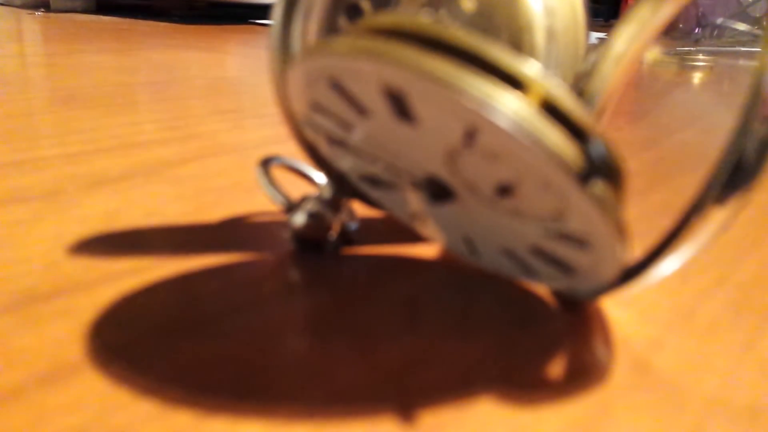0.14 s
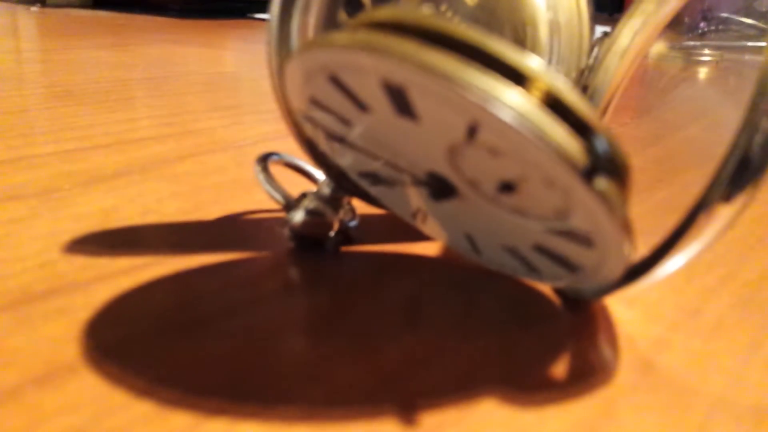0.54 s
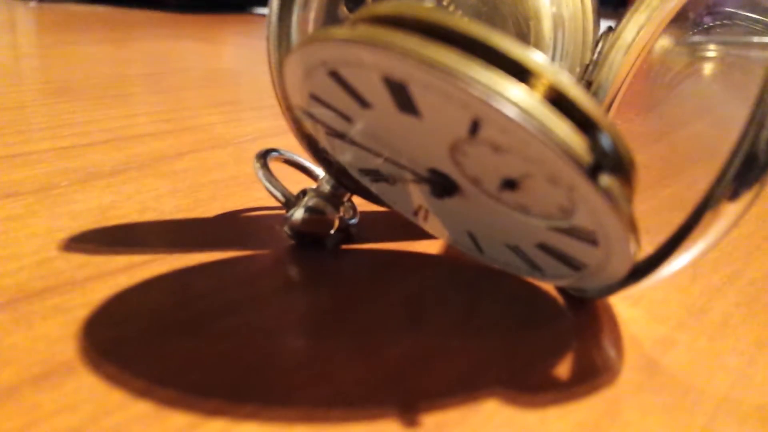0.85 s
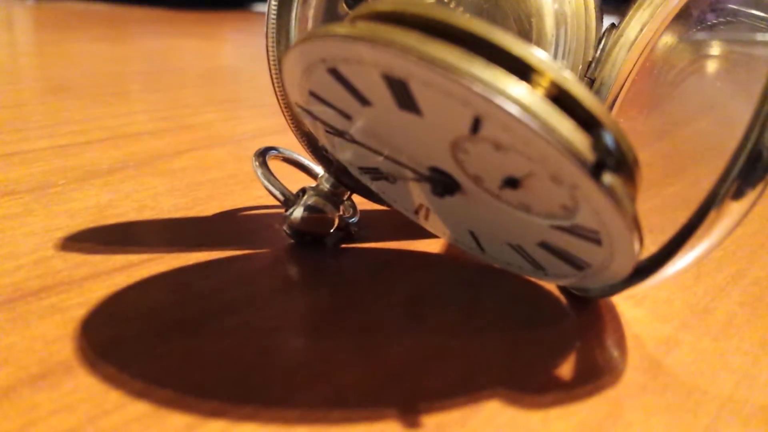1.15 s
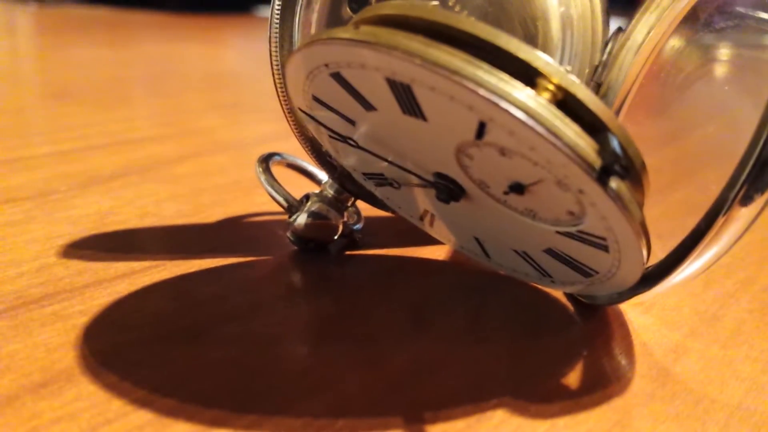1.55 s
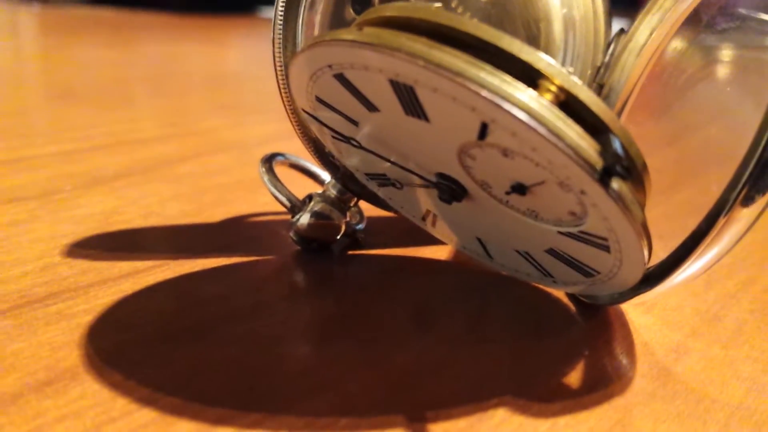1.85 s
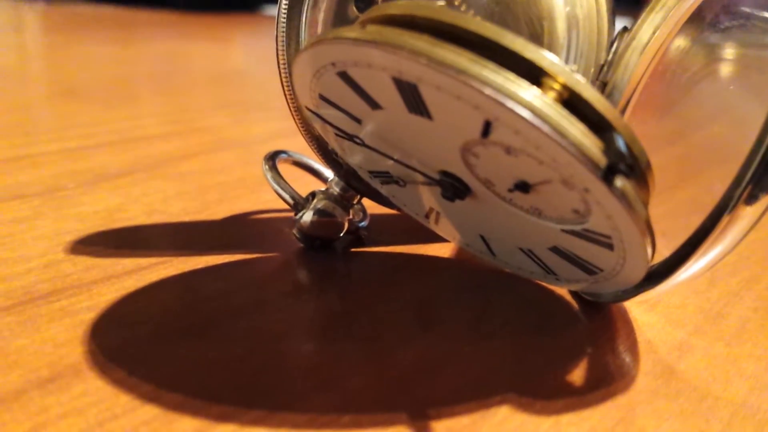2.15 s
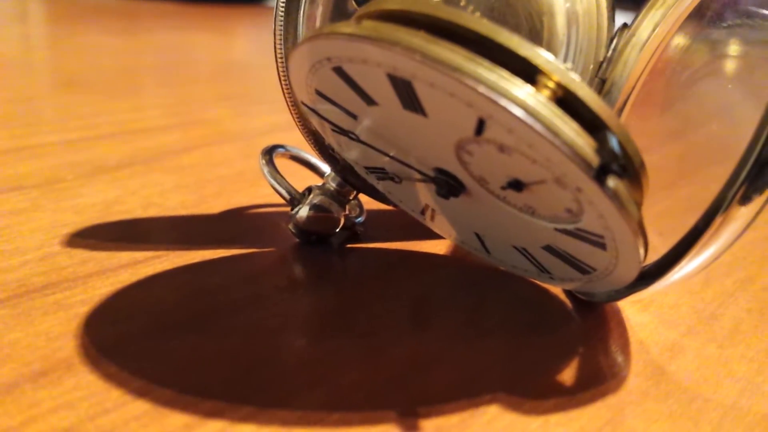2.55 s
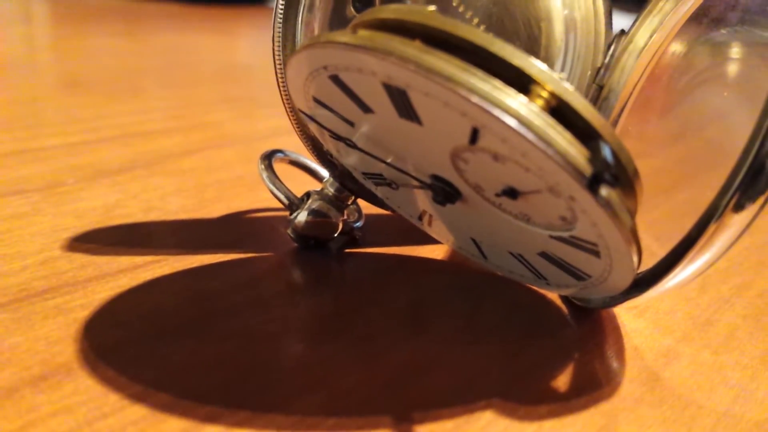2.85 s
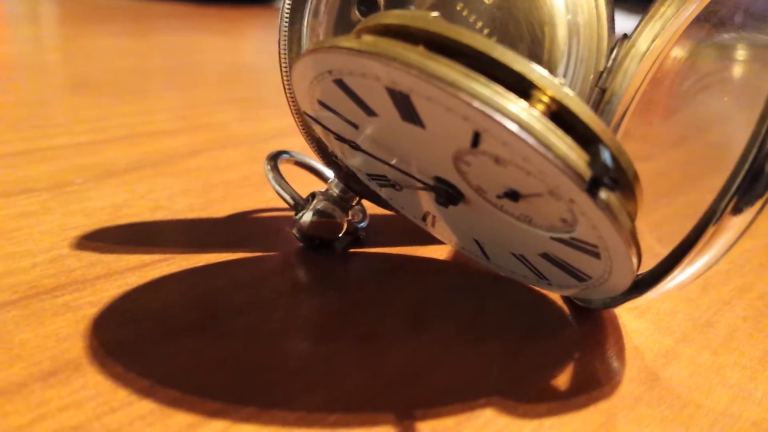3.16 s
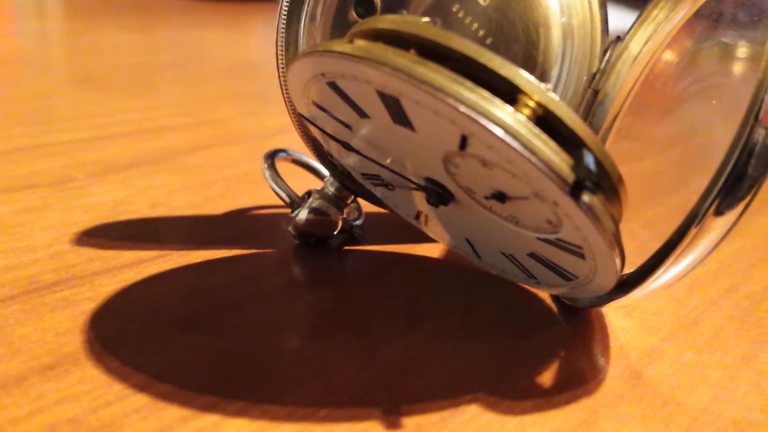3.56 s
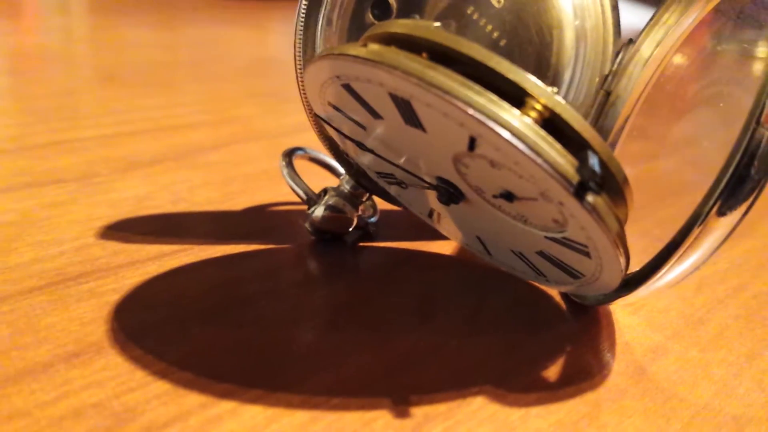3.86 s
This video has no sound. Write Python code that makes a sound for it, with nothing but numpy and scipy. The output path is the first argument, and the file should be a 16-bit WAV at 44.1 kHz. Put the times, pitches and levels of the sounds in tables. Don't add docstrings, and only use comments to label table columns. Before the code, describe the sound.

Mechanical watch beats in uneven tick-tock pairs, each a tiny cluster of metallic clicks, growing louder on the right; a faint lens whirr stops early, a sharp double knock hits midway, handling rustles follow.

```python
import sys
import numpy as np
from scipy import signal
from scipy.io import wavfile
from scipy.ndimage import uniform_filter1d

SR = 44100
rng = np.random.default_rng(int(sys.argv[2]) if len(sys.argv) > 2 else 0)


def amplitude_ratio(level_db):
    exponent = np.asarray(level_db, float) / 20
    return 10 ** exponent


def bounce(signal):
    frames = np.transpose(np.atleast_2d(signal))
    limited = np.clip(frames, -1, 1)
    pcm = np.round(limited * 32767).astype(np.int16)
    wavfile.write(sys.argv[1], SR, pcm)


N = 176400

# f/Hz, level/dB per Hz
LEFT_FLOOR = [(25, -100), (60, -83.5), (170, -88.5), (320, -96), (650, -92.5), (1500, -104), (2600, -110),
              (6000, -113)]
RIGHT_FLOOR = [(25, -102), (110, -89), (600, -97.5), (2200, -108), (5800, -109), (7200, -100), (8500, -109),
               (12000, -111)]
# f/Hz, likeness/-1 to 1
LIKENESS = [(60, 0.5), (240, 0.47), (950, 0.044), (15000, -0.057)]
# t/s, level/dB
HISS_RIDE = [
    (0, 0),
    (2.4, 0.5),
    (2.5, 10),
    (2.7, 0.5),
    (3.2, 1),
    (3.4, 5.5),
    (3.85, 5.5),
    (3.92, -0.5),
    (4, 2.5),
]
HISS_TOP_HZ, PATCH_DB, SWELL_DB, PORT_FLUTTER_DB = 14700, 3, -1, 2.5
WHIRR_END_S, WHIRR_DB, WHIRR_HZ, WHIRR_TOP_HZ = 1.135, -69, 805, 2670

# t/s, base level of lead-in, rattle and ring/dB, added lead-in level/dB, rattle length/s, added
# held ring level/dB
TICKS = [(0.1511, -31.5, -0.5, .006, 0), (0.5929, -30.5, -1.5, 0.0068, -5),
         (1.036, -29.5, -3.5, 0.0061, -4.5), (1.4786, -29, -2.5, 0.0068, -9.5),
         (1.9221, -25, -2, 0.0075, -7), (2.3641, -22.5, 0, 0.0054, -10), (2.806, -24, -3.5, 0.0081, -5.5),
         (3.249, -23.5, -1, .005, -4), (3.6689, -18.5, -5, 0.0056, -5.5)]
TOCKS = [(0.2828, -29.5, -3, 0.0098, -13), (0.7267, -30.5, -2, 0.011, -8.5), (1.17, -28, -4, 0.014, -13.5),
         (1.6137, -26, -6, 0.011, -19), (2.056, -21, -2.5, 0.014, -17), (2.5006, -20, -15, 0.013, -8.5),
         (2.9423, -22, -2.5, 0.015, -13.5), (3.3846, -19.5, -2, 0.013, -10),
         (3.8041, -21, -2.5, 0.013, -4.5)]
# offset/s, level/dB
TICK_LEAD = [
    (-.0375, -7.5),
    (-.0195, -2),
]
TOCK_LEAD = [
    (-.0318, -14.5),
    (-.0158, -11),
]
# t/s, peak level/dB
TICK_STRIKES = [(0.1518, -28.0), (0.1534, -30.0), (0.155, -36.0), (0.1563, -34.0), (0.1577, -38.0),
                (0.5939, -30.0), (0.5974, -38.0), (0.5988, -41.0), (0.6014, -40.0), (1.0368, -33.0),
                (1.0381, -32.0), (1.0398, -33.0), (1.0417, -42.0), (1.0431, -44.0), (1.0485, -36.0),
                (1.4795, -30.0), (1.4814, -36.0), (1.4828, -42.0), (1.4838, -38.0), (1.4851, -41.0),
                (1.494, -40.0), (1.9225, -22.0), (1.9243, -29.0), (1.9258, -32.0), (1.9271, -33.0),
                (1.9357, -31.0), (2.3644, -24.0), (2.3653, -27.0), (2.367, -33.0), (2.3787, -28.0),
                (2.8069, -17.0), (2.8085, -24.0), (2.8098, -27.0), (2.811, -30.0), (2.8119, -30.0),
                (3.2494, -19.0), (3.2504, -29.0), (3.2523, -31.0), (3.2627, -29.0), (3.6699, -20.0),
                (3.6714, -20.0), (3.6725, -21.0), (3.6746, -30.0), (3.6834, -25.0),
                (2.8185, -29),
]
TOCK_STRIKES = [(0.285, -28.0), (0.2863, -36.0), (0.2881, -30.0), (0.2902, -34.0), (0.2916, -31.0),
                (0.7281, -30.0), (0.7299, -35.0), (0.7312, -35.0), (0.7336, -34.0), (0.7352, -35.0),
                (0.7378, -36.0), (1.1714, -28.0), (1.1749, -30.0), (1.1775, -34.0), (1.1795, -34.0),
                (1.1809, -36.0), (1.6145, -28.0), (1.6182, -30.0), (1.6209, -31.0), (1.6247, -36.0),
                (1.6258, -37.0), (2.0568, -20.0), (2.0604, -21.0), (2.0631, -24.0), (2.065, -28.0),
                (2.0666, -28.0), (2.5, -14.0), (2.5038, -18.0), (2.5066, -22.0), (2.5103, -19.0),
                (2.943, -19.0), (2.9468, -22.0), (2.9497, -24.0), (2.952, -28.0), (2.9537, -25.0),
                (2.955, -28.0), (3.3858, -18.0), (3.3885, -24.0), (3.3895, -24.0), (3.3921, -25.0),
                (3.3941, -24.0), (3.3956, -24.0), (3.805, -15.0), (3.8086, -20.0), (3.8114, -19.0),
                (3.8134, -18.0), (3.815, -19.0), (3.8162, -20.0)]
# f/Hz, level/dB, time to fall 60 dB/s
TICK_MODES = [(2470, -28.5, 0.023), (5570, -7, 0.0045), (7060, -3, 0.0097), (8500, -22, 0.0031),
              (10500, -19.5, 0.0095), (13600, -18, .003)]
TOCK_MODES = [(4690, -26.5, 0.02), (5410, -15.5, 0.023), (6880, -4.5, 0.018), (8030, -6.5, 0.012),
              (9120, -15.5, 0.0069), (10500, -20.5, 0.0093), (13900, -19, 0.0038)]
LEAD_MODES = [(2460, -17.5, 0.022), (5450, -9, 0.004), (7180, 5, 0.0064)]
# f/Hz, width/Hz, level/dB
CLICK_COLOUR = [
    (6993, 2420, 7.5),
    (9500, 3600, -11.5),
]
CLICK_CUT_HZ, STRIKE_DB, WATCH_DB = 4400, 1.5, 2
TICK_RING_DB, TOCK_RING_DB, LEAD_RING_DB, RING_RISE_S = -0.5, -6, -3, 0.00017
DETUNE = 0.025
HELD_HZ, HELD_T60, HELD_LUMP_DB, TICK_SAG_DB_PER_S, TOCK_SAG_DB_PER_S = 6983, 0.0037, 2, 1515, 172
RATTLE_DB, RATTLE_PER_S, LEAD_FIZZ_DB, FIZZ_T60 = -22.5, 7200, -15.5, 0.031
JEWEL_HZ, JEWEL_DB, JEWEL_T60 = 12850, -33, 0.12
ROOM_DB, ROOM_T60 = -22.5, 0.29

# t/s, left level/dB, f/Hz, length/cycles, right level/dB
BUMPS = [(0.35, -42, 223, 1.37, -63), (0.562, -37.5, 317, 0.99, -66), (.602, -46.5, 550, 2.5, -73),
         (1.285, -46.5, 143, 0.71, -67), (1.453, -33.5, 286, 0.66, -53), (1.835, -43.5, 200, 1.4, -74),
         (2.4522, -14, 580, 2.1, -32.5), (2.4497, -44, 407, 0.48, -13), (2.4505, -29, 139, 0.79, -14.5),
         (2.4801, -9.5, 1440, 1, -13), (2.483, -19, 470, 1.04, -37), (2.977, -37.5, 211, 0.4, -59),
         (3.377, -44, 197, 2.4, -47), (3.584, -40, 303, 0.98, -23.5), (3.591, -53, 326, 1.1, -28.5),
         (3.739, -66, 138, 0.82, -37), (3.951, -31, 610, 0.98, -47)]
PORT_LAG_S = 0.00091
# t/s, length/s, level/dB
CHIRPS = [
    (0.379, 0.03, -65),
    (0.775, 0.044, -66),
    (1.986, 0.037, -62),
    (2.202, 0.039, -66),
]
CHIRP_HZ = 7500

# t/s, length/s, level/dB
LEFT_RUBS = [(2.456, 0.078, -43), (2.57, 0.034, -56), (2.943, 0.075, -50.5), (3.015, 0.088, -53.5),
             (3.21, 0.022, -36), (3.247, 0.083, -44.5), (3.362, 0.06, -50), (3.58, 0.077, -57),
             (3.772, 0.046, -63)]
# f/Hz, width/Hz, level/dB
LEFT_CASE = [
    (648, 270, 3.5),
    (1210, 520, -40),
    (250, 270, -11),
]
# t/s, length/s, body level/dB, body f/Hz, fizz level/dB
RIGHT_RUBS = [(2.446, 0.092, -46, 366, -41.5), (2.577, 0.03, -56, 392, -55.5), (2.999, 0.1, -64, 590, -56),
              (3.205, 0.03, -53.5, 500, -45.5), (3.245, 0.016, -56, 250, -60),
              (3.263, 0.065, -55.5, 434, -47.5), (3.376, 0.071, -40.5, 109, -76),
              (3.436, 0.11, -44.5, 343, -52.5), (3.547, 0.036, -58, 299, -58),
              (3.577, 0.12, -41.5, 360, -43.5), (3.697, .035, -61, 405, -48),
              (3.74, 0.056, -53.5, 284, -44.5), (3.762, 0.066, -56, 1520, -73),
              (3.944, 0.056, -59, 423, -57)]
RUB_RISE_S, RUB_FALL, RUB_TAIL_S = 0.0036, 0.42, 0.011
GRAINS_PER_S, GRAIN_DB, RUB_WIDE_DB, RUB_TILT_HZ = 4000, 2.5, -8.5, 1410
# t/s, level/dB, time to fall 60 dB/s, added snap/ratio
CRACKS = [(2.4492, -13.5, 0.027, 0.26), (2.479, -3.5, 0.001, 0.33), (2.594, -39, 0.054, 0.2),
          (2.9925, -42, 0.0088, .1), (3.935, -54, 0.0035, 0.2), (3.9477, -32.5, 0.0014, 3),
          (3.997, -40, 0.0027, 0.9)]
# f/Hz, width/Hz, level/dB
PORT = [
    (6780, 2600, 12.5),
    (4580, 2900, -4),
    (8400, 1000, -5),
    (11600, 12000, -9),
]
SNAP_HZ, SNAP_WIDTH_HZ = 1300, 2400

EDGE_HZ, RUMBLE_CUT_HZ = 15700, 40


def evened(x):
    return x / np.sqrt(np.mean(x ** 2) + 1e-20)


def read(points, hz):
    f, value = np.transpose(points)
    return np.interp(np.log(hz + 1), np.log(f + 1), value)


def add(mix, s, sound):
    part = mix[max(round(s * SR), 0):][:len(sound)]
    part += sound[:len(part)]


def resonate(x, hz, width):
    return signal.lfilter(*signal.iirpeak(hz, hz / width, SR), x)


def resonate_twice(x, hz, width):
    return resonate(resonate(x, hz, width), hz, width)


def body(x, peaks):
    return sum((-1) ** k * amplitude_ratio(db) * resonate_twice(x, hz, width) for k, (hz, width, db) in enumerate(peaks))


def floor():
    frames, hz = N // 256 + 5, np.fft.rfftfreq(1024, 1 / SR)
    a, b, c, d, patches = rng.standard_normal((frames, 513, 5)).T
    patches = uniform_filter1d(uniform_filter1d(patches, size=5, axis=0), size=10, axis=1)
    patches = evened(patches)
    swell = evened(uniform_filter1d(rng.standard_normal(frames), size=12))
    same = np.clip(read(LIKENESS, hz), -1, 1)[:, None]
    left = a + 1j * b
    right = same * left + np.sqrt(1 - same ** 2) * (c + 1j * d)
    level = np.array([read(LEFT_FLOOR, hz), read(RIGHT_FLOOR, hz)])[:, :, None]
    hz = hz[:, None]
    near_port = np.exp(-((hz - HELD_HZ) / 1200) ** 2)
    level = level + PORT_FLUTTER_DB * near_port * (patches + swell[::-1])
    low = 1 / (1 + (hz / 1500) ** 2)
    level = level + low * (PATCH_DB * patches + SWELL_DB * swell)
    ride = np.interp(np.arange(frames) * 256 / SR, *np.transpose(HISS_RIDE))
    spectrum = np.array([left, right]) * amplitude_ratio(level + ride + 18) * (hz < HISS_TOP_HZ)
    return signal.istft(spectrum, nperseg=1024, noverlap=768)[1][:, :N]


def lens_whirr():
    band = signal.butter(4, [WHIRR_HZ, WHIRR_TOP_HZ], "bandpass", fs=SR, output="sos")
    whirr = evened(signal.sosfilt(band, rng.standard_normal(N)))
    on = np.clip((WHIRR_END_S - np.arange(N) / SR) / 0.027, 0, 1)
    return amplitude_ratio(WHIRR_DB) * whirr * on * amplitude_ratio(np.array([[0], [-14.]]))


def strike(modes, ring_db):
    t = np.arange(5000) / SR
    cut = signal.butter(4, CLICK_CUT_HZ, "highpass", fs=SR, output="sos")
    ping = signal.sosfilt(cut, body(1. * (t == 0), CLICK_COLOUR))
    ring = np.zeros((3, len(t)))
    for hz, db, t60 in modes:
        pitch = hz * (1 + DETUNE * rng.standard_normal((3, 1)))
        ring += amplitude_ratio(db - 60 * t / t60) * np.sin(2 * np.pi * pitch * t)
    rise = 1 - np.exp(-(t / RING_RISE_S) ** 2)
    return ping / abs(ping).max() + amplitude_ratio(ring_db) * ring * rise


def held_ring(t, db, over, sag_db):
    lumps = HELD_LUMP_DB * evened(uniform_filter1d(rng.standard_normal(len(t)), size=50))
    rise = np.clip((t - 0.0008) / 0.0006, 0, 1)
    pitch = HELD_HZ * (1 + DETUNE / 2 * rng.uniform(-0.78, 1))
    return amplitude_ratio(db + lumps - sag_db * t - 60 * over / HELD_T60) * rise * np.sin(2 * np.pi * pitch * t)


def beats(rows, lead, strikes, click, lead_click, sag_db):
    early, train, held = np.zeros((3, N)), np.zeros((3, N)), np.zeros(N)
    t = np.arange(1500) / SR
    for k, (s, db) in enumerate(strikes):
        add(train[k % 3], s, np.array([amplitude_ratio(db + STRIKE_DB - WATCH_DB)]))
    for k, (s, db, lead_db, rattle_s, ring_db) in enumerate(rows):
        fizz = rng.standard_normal((3, 1500)) * (rng.random((3, 1500)) < RATTLE_PER_S / SR)
        over = np.maximum(t - rattle_s, 0)
        rattle = amplitude_ratio(db + RATTLE_DB - 60 * over / FIZZ_T60) * np.minimum(t / 0.0019, 1) * fizz[2]
        add(train[k % 3], s, rattle)
        add(held, s, held_ring(t, db + ring_db, over, sag_db))
        for (offset, offset_db), specks in zip(lead, fizz):
            hit = (t == 0) + amplitude_ratio(LEAD_FIZZ_DB - 60 * t / FIZZ_T60) * specks
            add(early[k % 3], s + offset, amplitude_ratio(db + offset_db + lead_db) * hit)
    clicks = signal.oaconvolve(train, click, axes=1) + signal.oaconvolve(early, lead_click, axes=1)
    return clicks[:, :N].sum(0) + held


def watch():
    tick, tock = strike(TICK_MODES, TICK_RING_DB), strike(TOCK_MODES, TOCK_RING_DB)
    unlock = strike(LEAD_MODES, LEAD_RING_DB)
    x = beats(TICKS, TICK_LEAD, TICK_STRIKES, tick, unlock, TICK_SAG_DB_PER_S)
    x = x + beats(TOCKS, TOCK_LEAD, TOCK_STRIKES, tock, tock, TOCK_SAG_DB_PER_S)
    x = x + jewel_rings() + chirps()
    t = np.arange(15000) / SR
    tail = rng.standard_normal(15000) * amplitude_ratio(-60 * t / ROOM_T60) * (t > 0.004)
    x = x + amplitude_ratio(ROOM_DB) * signal.oaconvolve(x, tail / np.linalg.norm(tail))[:N]
    return np.array([np.zeros(N), amplitude_ratio(WATCH_DB) * x])


def jewel_rings():
    out, t = np.zeros(N), np.arange(4000) / SR
    for s, db, *_ in TOCKS:
        fade = amplitude_ratio(db + JEWEL_DB - 60 * t / JEWEL_T60) * np.minimum(t / 0.016, 1) ** 2
        add(out, s, fade * np.sin(2 * np.pi * JEWEL_HZ * t))
    return out


def bumps():
    out = np.zeros((2, N))
    for s, db, hz, cycles, right_db in BUMPS:
        u = np.linspace(-3, 3, int(3 * cycles / hz * SR))
        start = s - len(u) / 2 / SR
        shape = np.exp(-(u * np.where(u < 0, 1.4, 0.8)) ** 2)
        push = -shape * np.exp(1j * (np.pi * cycles * u - 0.14 * u ** 2))
        shifted = push * np.exp(2j * np.pi * hz * PORT_LAG_S)
        add(out[0], start, amplitude_ratio(db) * push.real)
        add(out[1], start, amplitude_ratio(right_db) * shifted.real)
    return out


def chirps():
    out = np.zeros(N)
    for s, length, db in CHIRPS:
        hiss = evened(resonate_twice(rng.standard_normal(3000), CHIRP_HZ, 400))
        count = int(length * SR)
        add(out, s, amplitude_ratio(db) * np.hanning(count) * hiss[:count])
    return out


def grains(count):
    when, sign, size = rng.random((count, 3)).T
    clicks = (when < GRAINS_PER_S / SR) * np.sign(sign - 0.5)
    return evened(clicks * amplitude_ratio(-GRAIN_DB * np.log(size + 0.00049)))


def stroke(length, swell):
    t = np.arange(0, length, 1 / SR)
    lumps = amplitude_ratio(2.9 * evened(uniform_filter1d(rng.standard_normal(9000), size=300)))
    push = np.minimum(t / RUB_RISE_S, 1) * (t / length) ** swell * (1 - t / length) ** RUB_FALL
    push = np.pad(push, (0, 9000 - len(t)))
    r = np.exp(-1 / RUB_TAIL_S / SR)
    tail = signal.lfilter([1 - r], [1, -r], push)
    return np.maximum(push, tail) * lumps


def rubs():
    out, left = np.zeros((2, N)), np.zeros(N)
    for s, length, db in LEFT_RUBS:
        add(left, s, amplitude_ratio(db) * stroke(length, 0.15))
    g = grains(N)
    left = body(left * g, LEFT_CASE) / np.std(body(g, LEFT_CASE))
    out += np.array([left, -amplitude_ratio(-16.5) * left])
    tilt = signal.butter(1, RUB_TILT_HZ, fs=SR)
    for s, length, db, hz, fizz_db in RIGHT_RUBS:
        g, press, slip = grains(9000), stroke(length, 0.11), stroke(length, 0.37)
        wide = evened(signal.lfilter(*tilt, g))
        low = evened(resonate_twice(g, hz, 1.78 * hz)) + amplitude_ratio(RUB_WIDE_DB) * wide
        fizz = evened(body(g, PORT)) + 0.083 * resonate_twice(g, 11000, 9000)
        add(out[1], s, press * amplitude_ratio(db) * low + slip * amplitude_ratio(fizz_db) * fizz)
    return out


def cracks():
    out, t = np.zeros((2, N)), np.arange(2000) / SR
    for s, db, t60, snap in CRACKS:
        puff = (rng.standard_normal(2000) - 2 * (t == 0)) * amplitude_ratio(-60 * t / t60)
        crack = evened(body(puff, PORT)) + snap * evened(resonate(puff, SNAP_HZ, SNAP_WIDTH_HZ))
        leak = resonate(resonate(puff, 2600, 1600), 3200, 1700)
        add(out[1], s, amplitude_ratio(db) * crack / abs(crack).max())
        add(out[0], s, amplitude_ratio(db - 9) * leak / abs(puff).max())
    return out


def scene():
    return watch() + bumps() + cracks() + rubs() + floor() + lens_whirr()


def roll_off(x):
    return signal.sosfilt(signal.butter(12, 15610, fs=SR, output="sos"), x)


def record(dry):
    bass_cut = signal.butter(2, RUMBLE_CUT_HZ, "highpass", fs=SR, output="sos")
    x = signal.sosfilt(bass_cut, dry)
    treble_cut = signal.firwin(101, EDGE_HZ, window=("kaiser", 6), fs=SR)
    x = signal.oaconvolve(x, treble_cut[None], "same")
    return roll_off(x)


dry = scene()
out = record(dry)
bounce(out)
```